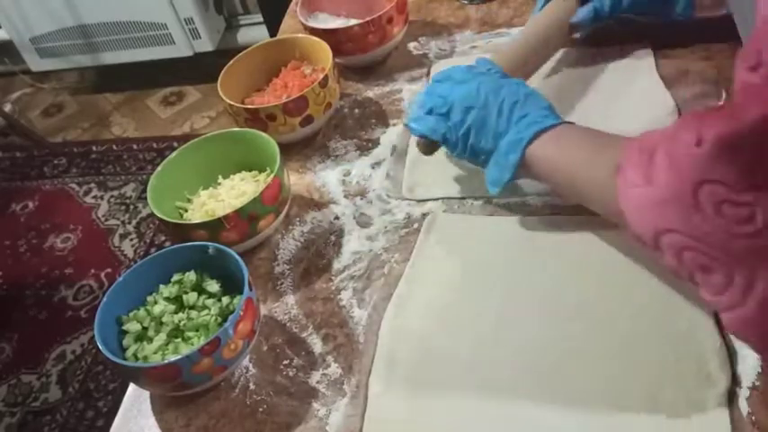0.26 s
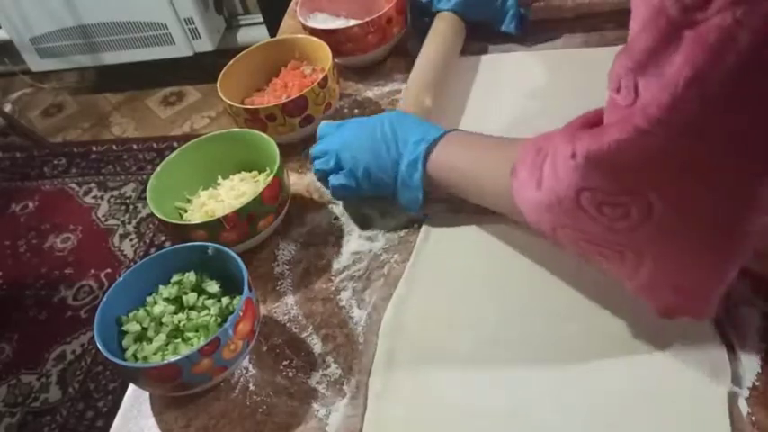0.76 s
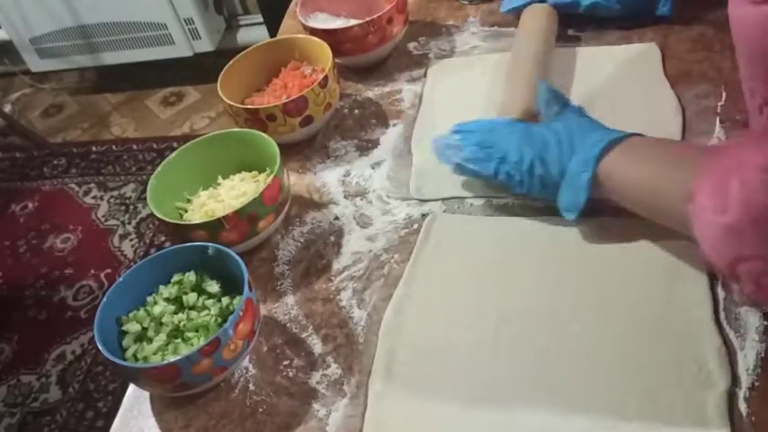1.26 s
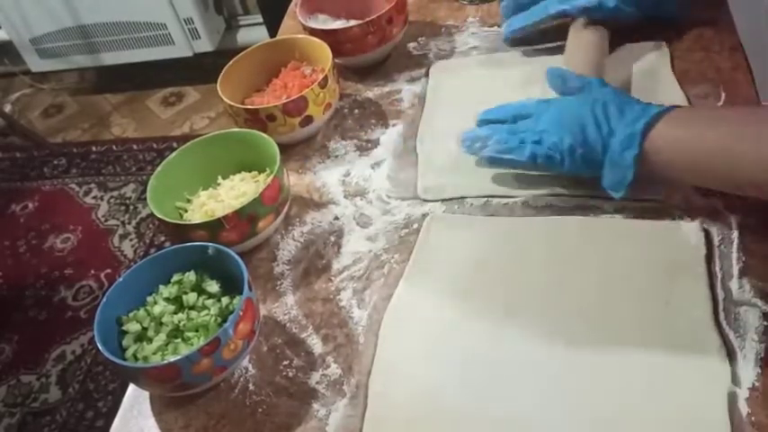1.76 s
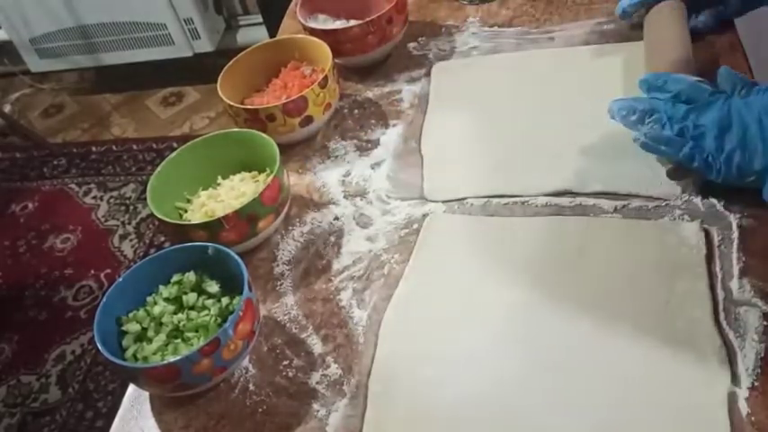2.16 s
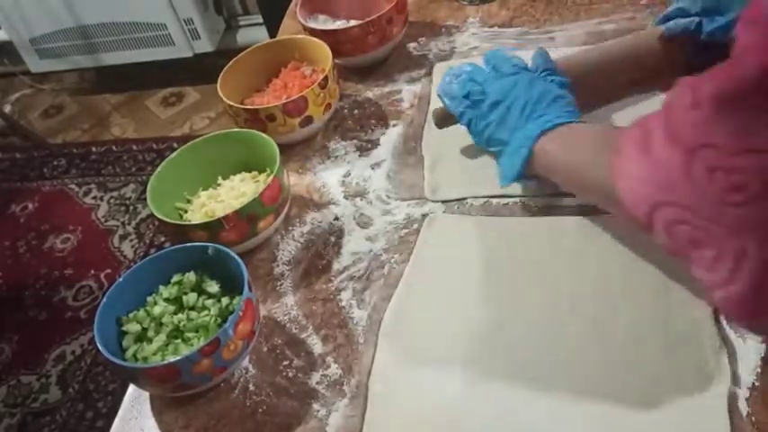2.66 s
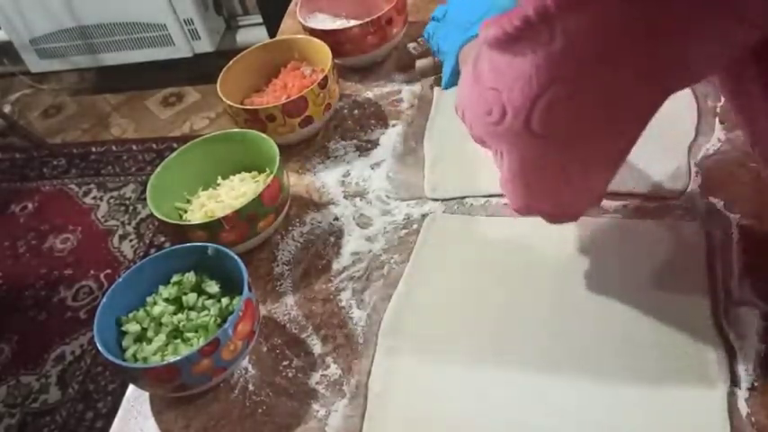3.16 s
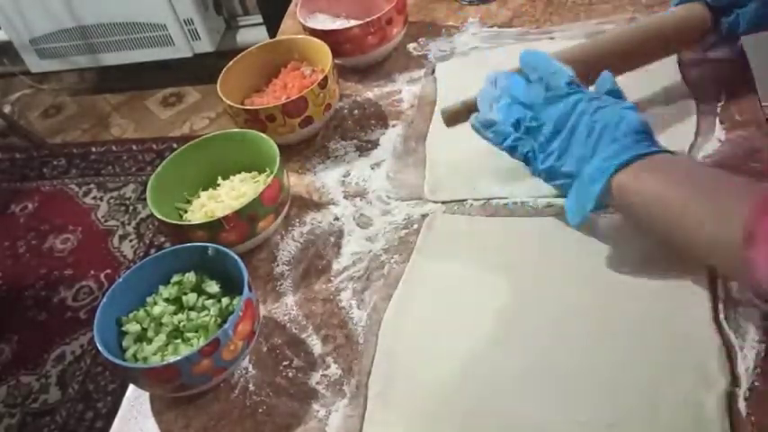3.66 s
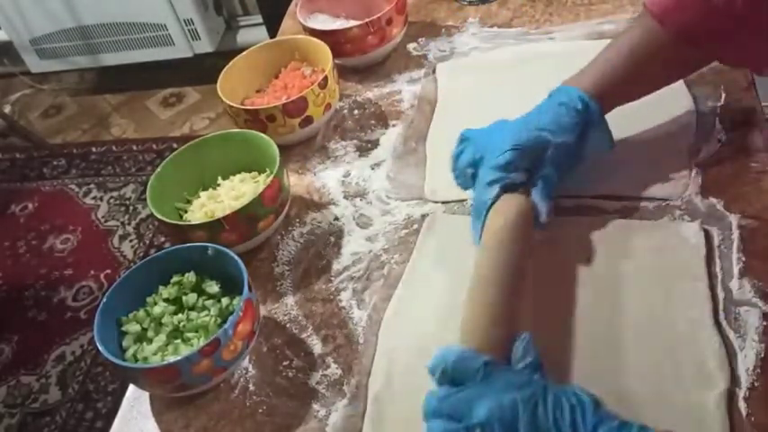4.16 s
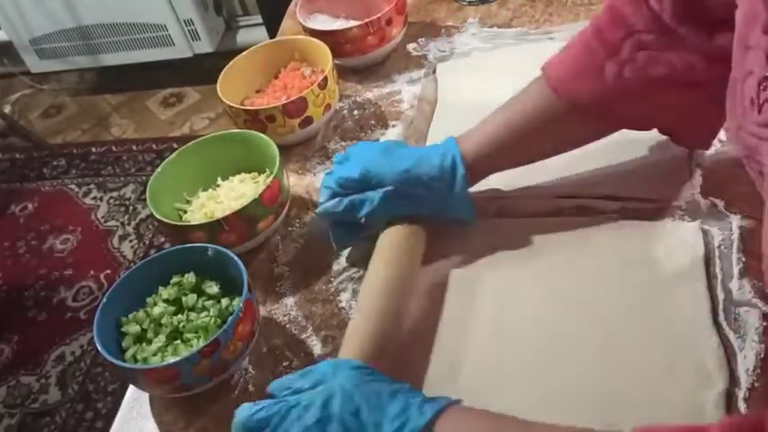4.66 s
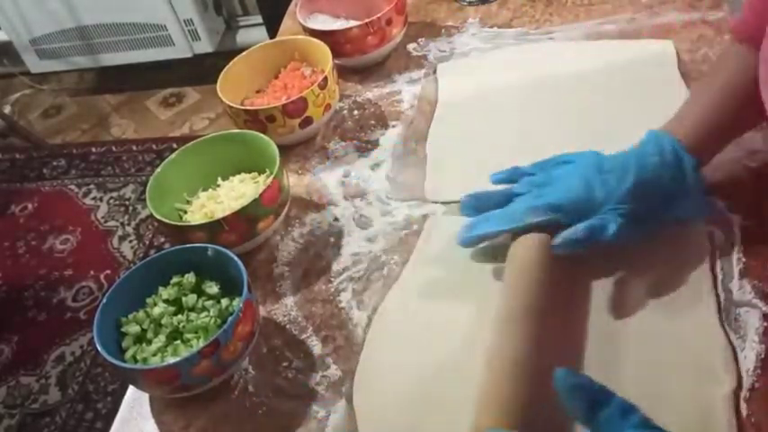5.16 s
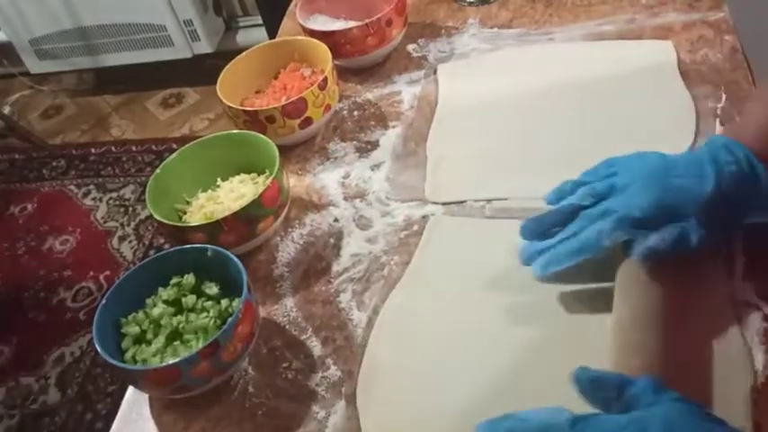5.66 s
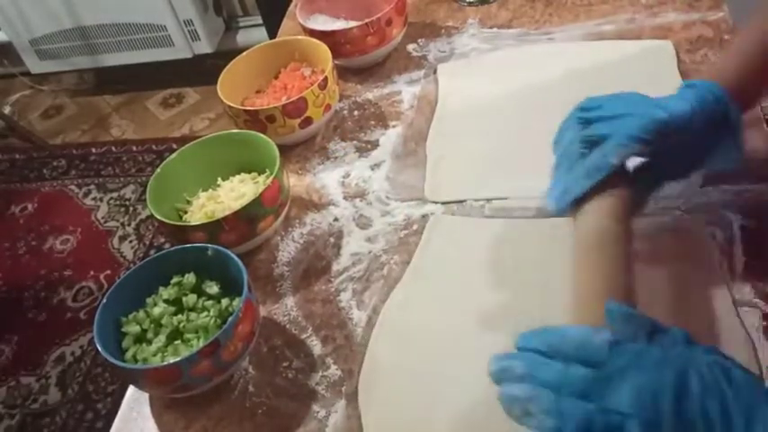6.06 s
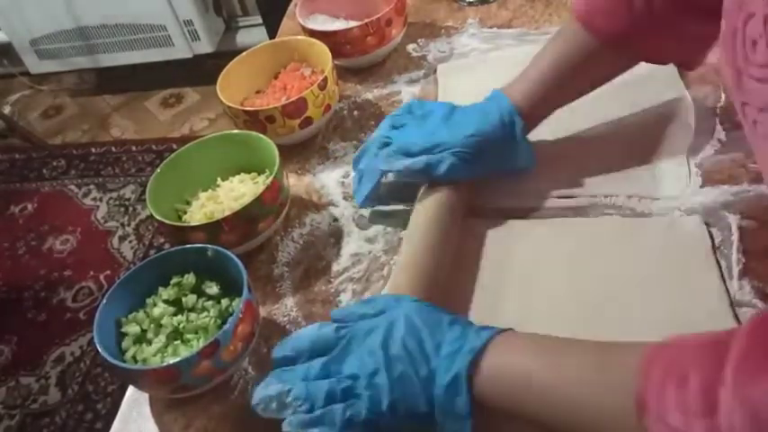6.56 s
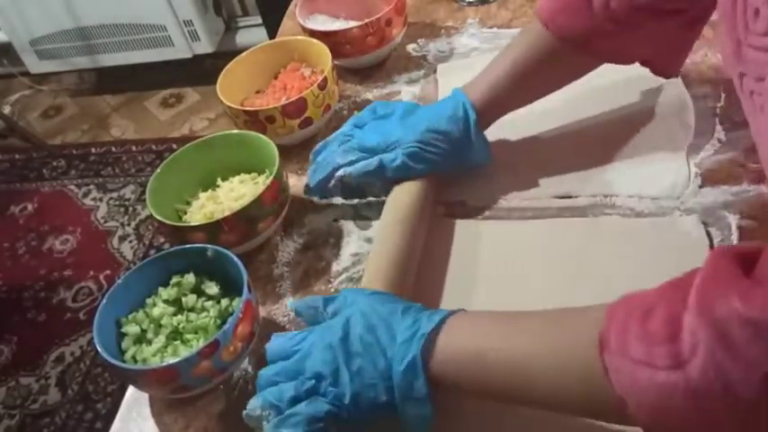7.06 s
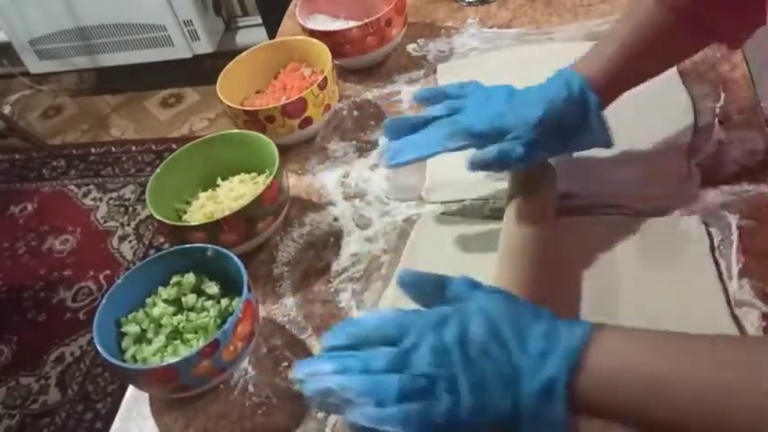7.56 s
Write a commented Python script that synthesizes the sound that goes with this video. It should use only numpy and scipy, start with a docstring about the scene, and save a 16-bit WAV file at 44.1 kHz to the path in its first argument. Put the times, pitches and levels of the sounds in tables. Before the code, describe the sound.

A wooden rolling pin rumbles softly over dough as rubber gloves rub and hiss, with light knocks and one hard knock late on.

```python
"""A wooden pin rolled over dough by gloved hands, on a floured table in a quiet kitchen.
The pin rumbles and drones under load, judders and knocks on the table top, once hard, just after a
low ringing scrape. Rubber gloves stick and slip on the wood with a dry hiss and brief squeaks.
Two microphone ports close together hear it mostly direct, with faint room echoes and still air."""
import sys
import numpy as np
from scipy import signal
from scipy.io import wavfile
from scipy.ndimage import uniform_filter1d

SR = 44100
rng = np.random.default_rng(int(sys.argv[2]) if len(sys.argv) > 2 else 0)


def int16_out(signal):
    """Quantize to a 16-bit WAV file."""
    q = np.round(np.clip(np.atleast_2d(signal).T, -1, 1) * 32767)
    wavfile.write(sys.argv[1], SR, q.astype(np.int16))


N = 344421

# overall treble colour, slightly dull near 5 kHz, hollow from 9 to 11 kHz: f/Hz, gain/dB
TREBLE_COLOUR = [(4600, 2), (4900, -4), (5900, -5.5), (6200, -0.5), (8400, -3), (8700, -12), (10000, -15.5),
                 (11000, -33), (11350, -43), (11650, 2)]
# how alike noise is at the two ports: f/Hz, correlation
PORT_LIKENESS = [(60, 0.29), (150, 0.13), (400, 0.28), (1000, 0.23), (2500, 0.09), (5000, 0.22),
                 (9000, 0.103), (15000, .05)]
# balance of noise between the ports: f/Hz, left minus right/dB
PORT_BALANCE = [(60, 10), (130, -1), (290, 2), (640, 0), (1410, 0), (3100, -1), (6820, 3), (15000, -3.5)]
# still kitchen air and microphone hiss: f/Hz, relative density/dB
AIR_SPECTRUM = [(30, -39), (55, -12.5), (100, 2.5), (250, -1), (800, -11), (2200, -15), (4300, -13),
                (7400, -12), (15000, -21.5)]
# decay of the kitchen's echoes: f/Hz, t60/s
KITCHEN_DECAY = [(80, 0.18), (250, 0.25), (700, 0.19), (1500, 0.11), (4000, 0.064)]
# brief glove squeaks, and one low ringing scrape just before the hard knock:
# middle t/s, width at half height/s, f/Hz, level/dB
SQUEAKS_AND_SCRAPE = [(1.966, 0.067, 1340, -68), (2.823, 0.085, 1730, -64), (3.499, 0.082, 1195, -65),
                      (5.365, 0.085, 1730, -68.5), (6.272, 0.062, 501, -56.5)]
# glove slides: full speed at t/s, rise/s, hold/s, fall/s, hiss level/dB, scuff re hiss/dB
GLOVE_SLIDES = [(0.0, .01, 0.0054, 0.11, -56, -4.5), (0.151, 0.0093, 0.059, 0.062, -46, -14),
                (0.266, 0.13, 0.077, .04, -56, -8.5), (0.439, 0.1, 0.19, 0.091, -51, -6),
                (0.68, 0.037, .005, 0.29, -49, -4.5), (0.96, 0.052, 0.11, 0.24, -56.5, -9),
                (1.137, 0.14, .01, 0.24, -52, -5), (1.3, 0.23, 0.028, 0.16, -54.5, -6),
                (1.42, 0.085, .005, 0.078, -49.5, -13), (1.622, .01, .01, .05, -54.5, -16),
                (1.631, 0.016, 0.0046, 0.1, -52.5, -6.5), (1.785, 0.15, 0.057, .15, -57, -11.5),
                (1.964, 0.18, .005, 0.096, -49, -9), (2.127, 0.31, .005, 0.2, -50.5, -13),
                (2.302, 0.15, .005, 0.27, -49.5, -6), (2.532, 0.021, 0.033, 0.073, -50, -10),
                (2.635, 0.1, 0.032, 0.077, -45, -14), (2.812, 0.097, .005, 0.11, -44, -7.5),
                (2.882, 0.11, 0.25, 0.079, -58, -4.5), (3.33, 0.19, 0.14, 0.19, -54.5, -6.5),
                (3.496, 0.27, 0.15, 0.09, -47.5, -6.5), (3.735, .08, .02, 0.2, -57, -6),
                (3.849, 0.049, 0.021, 0.063, -39, -17), (3.932, .1, 0.11, 0.062, -50.5, -12),
                (4.125, 0.12, 0.12, .1, -59.5, -9.5), (4.281, 0.079, .005, 0.25, -47.5, -4.5),
                (4.5, 0.33, 0.0045, 0.039, -50.5, -14), (4.518, 0.14, 0.22, 0.23, -56, -5.5),
                (5.006, 0.22, .005, 0.21, -50, -8), (5.17, 0.27, 0.078, 0.25, -49.5, -7.5),
                (5.348, .006, .003, .03, -47, -16), (5.388, 0.16, 0.0058, 0.042, -46.5, -12.5),
                (5.568, 0.014, 0.0024, 0.096, -48, -9), (5.745, 0.29, 0.08, 0.08, -56, -7.5),
                (5.88, 0.14, .005, 0.18, -49.5, -9.5), (6.035, 0.03, .005, 0.17, -50.5, -12),
                (6.125, 0.048, 0.066, 0.11, -48, -17.5), (6.344, 0.058, 0.031, 0.1, -51, -6.5),
                (6.484, 0.29, .01, 0.68, -53.5, -7), (6.892, 0.51, .005, 0.097, -57.5, -3.5),
                (7.024, 0.12, 0.0041, 0.11, -59, -5), (7.265, 0.24, 0.11, .2, -54.5, -5),
                (7.443, 0.36, 0.038, 0.045, -49, -13), (7.652, 0.028, 0.057, 0.059, -60.5, -7.5),
                (7.714, 0.009, 0.0066, 0.16, -50, -8)]
# fine hiss of the gloves: f/Hz, relative density/dB
HISS_SPECTRUM = [(2000, -29.5), (4000, -16.5), (6300, -2.5), (7400, 0.5), (9000, -5), (13000, -13),
                 (16000, -10)]
# lower scuff of the gloves: f/Hz, relative density/dB
SCUFF_SPECTRUM = [(300, -5.5), (800, -18.5), (1300, -5), (2200, -8), (3800, -1.5), (5000, -4.5),
                  (7000, -8.5), (10000, -36)]
# the pin rolling under load: t/s, rumble level/dB, drone level/dB
ROLL_LEVELS = [(0.0, -67.5, -75), (0.51, -69, -73), (1.1, -67, -68.5), (1.6, -66.5, -71.5),
               (2.05, -65.5, -66.5), (2.45, -71.5, -76), (3.0, -68, -67), (3.2, -68, -72),
               (3.49, -65, -67.5), (4.12, -72.5, -73.5), (4.7, -66, -73.5), (5.16, -65.5, -72),
               (5.538, -68, -72.5), (5.77, -64, -64), (6.101, -65, -72.5), (6.6, -63, -69),
               (6.92, -68, -67), (7.114, -66, -71), (7.3, -60, -69.5), (7.512, -70, -69),
               (7.81, -62, -78.5)]
# rumble of pin on dough and table: f/Hz, relative density/dB
RUMBLE_SPECTRUM = [(40, -33.5), (62, -2), (100, 1.5), (250, 2.5), (450, -13), (900, -40.5)]
# the pin's own hollow drone: f/Hz, relative density/dB
DRONE_SPECTRUM = [(200, -29), (450, 1.5), (800, -4), (1400, -16.5), (2500, -32.5)]
# low modes of the table top: f/Hz, relative level/dB, t60/s
TABLE_MODES = [(81.4, -1, .18), (103.1, 1, .22), (131, 0, 0.28), (195, 2, 0.22), (215, -1, .2),
               (262, -2, 0.22), (303, -3, .2), (343, -11, 0.16), (444, 0, 0.16), (484, -6, 0.15),
               (553, -6, .14), (658, -2, 0.24), (700, -8, .22)]
# clear modes of the pin: f/Hz, relative level/dB, t60/s
PIN_MODES = [(787, -18, .3), (851, -17, .22), (888, -13, .22), (960, -14, .23), (1097, -17, .2),
             (1172, -19, .2), (1294, -19, .42), (1415, -22, .2)]
# upper modes of pin and table, too dense to tell apart: f/Hz, relative density/dB, t60/s
DENSE_MODES = [(302.6, -31, 0.26), (450, 6, 0.22), (605, -3.5, 0.3), (900, -1.5, 0.16), (1400, -13, 0.32),
               (1900, -22, 0.19), (2800, -24.5, 0.15), (4440, -31, .06), (7000, -38, 0.033)]
# the pin juddering: start t/s, end t/s, beat rate/Hz, level at the crest/dB, thump f/Hz
PIN_JUDDERS = [(1.775, 2.25, 19.9, -52.5, 272), (5.653, 5.92, 20.0, -47.5, 287)]
# the pin knocking on the table: t/s, thump level/dB, thump f/Hz, ring re thump/dB, clack re thump/dB
PIN_KNOCKS = [(0.0501, -49.5, 533, -27, -16), (0.059, -50, 280, -16, -30), (0.141, -51.5, 550, -10, -16),
              (0.151, -53, 258, -17, -22), (0.236, -55, 262, -4, -10), (.578, -57, 150, -9, -25),
              (.603, -54.5, 78.5, -10, -37), (1.182, -51, 1150, -20, -13), (1.2, -49.5, 624, -18, -23),
              (1.213, -62, 266, 8, -20), (1.505, -56, 82, -17, -35), (1.645, -56, 400, -20, -11),
              (2.308, -43.5, 520, -18, -23), (2.315, -49.5, 245, 2, -14), (2.803, -57, 79.4, -9, -30),
              (2.835, -57, 85, -8, -28), (3.553, -52, 307, -30, -17), (4.280, -45.5, 1400, -27, -18),
              (4.2828, -35.5, 130, -2, -41), (4.298, -36.5, 220, -7.5, -43), (5.3, -53, 500, -5, -11),
              (5.587, -57.5, 130, -8, -25), (6.249, -52, 486, -6, -20), (6.332, -5.5, 260, -9.5, -27.5),
              (6.3369, -12, 410, -20, -14.5), (6.3409, -8, 439, -10.5, -30), (7.729, -43.5, 103, -13, -23),
              (7.753, -65, 150, -3, 0)]

LAG_S = 5 / SR  # the right port hears the table later
LOW_CUT_HZ, BAND_LIMIT_HZ = 62, 15450
AIR_DB, ECHO_DB = -64, -16
SQUEAK_WIDTH_HZ = 32
SWING_DB = 20  # a slide gains this over its rise time and loses it over its fall time
DEEP_HZ = 95  # thumps below this pitch wobble for several cycles
JUDDER_RING_DB, JUDDER_CLACK_DB = -9, -17  # re each beat's thump


def gain_of(db):
    """Decibels to a factor."""
    return 10 ** (np.asarray(db) / 20)


def unit_rms(x):
    """Scales to an rms of one."""
    return x / np.sqrt(np.mean(x ** 2) + 1e-20)


def curve_at(points, hz):
    """Interpolates a table over log frequency."""
    f, value = np.transpose(points)
    return np.interp(np.log(hz + 1), np.log(f + 1), value)


def add(mix, start, sound):
    """Mixes a sound in from sample start on."""
    part = mix[max(start, 0):][:len(sound)]
    part += sound[:len(part)]


def ring(modes, samples, phase=0):
    """Struck modes: a sum of dying sines."""
    t = np.arange(samples) / SR
    return sum(gain_of(db - 60 * t / t60) * np.sin(2 * np.pi * f * t - phase) for f, db, t60 in modes)


def port_noise(spectrum, patchy_db, size=512):
    """Noise of rms one at the two ports, its level drifting in patches of time and frequency."""
    frames, hz = 4 * N // size + 5, np.fft.rfftfreq(size, 1 / SR)
    a, b, c, d, patches = rng.standard_normal((frames, len(hz), 5)).T
    patches = unit_rms(uniform_filter1d(uniform_filter1d(patches, size=6, axis=0), size=14, axis=1))
    likeness = curve_at(PORT_LIKENESS, hz)[:, None]
    left = a + 1j * b
    right = likeness * left + np.sqrt(1 - likeness ** 2) * (c + 1j * d)
    right *= np.exp(-2j * np.pi * hz * LAG_S)[:, None]
    lean = gain_of(curve_at(PORT_BALANCE, hz) / 2)[:, None]
    colour = gain_of(curve_at(spectrum, hz)[:, None] + patchy_db * patches)
    bands = np.array([left * lean, right / lean]) * colour
    return unit_rms(signal.istft(bands, nperseg=size, noverlap=3 * size // 4)[1][:, :N])


def room_tone():
    """Still kitchen air and the microphone's own hiss."""
    return gain_of(AIR_DB) * port_noise(AIR_SPECTRUM, patchy_db=2.5, size=2048)


def kitchen_echoes(source):
    """Room reflections: sparse taps of random sign, each band dying at its own speed."""
    taps = np.zeros((2, SR // 2))
    arrivals = np.arange(160, SR // 2 - 20, 20) + rng.integers(0, 20, (2, (SR // 2 - 161) // 20))
    np.put_along_axis(taps, arrivals, rng.choice([-1., 1.], arrivals.shape), 1)
    taps = taps + 0.3 * taps[::-1]  # close ports share some echoes
    hz, t, bands = signal.stft(taps, SR, nperseg=512)
    decay = gain_of(-60 * t / curve_at(KITCHEN_DECAY, hz)[:, None])
    tail = signal.istft(bands * decay, SR, nperseg=512)[1]
    tail /= np.linalg.norm(tail[0])
    return gain_of(ECHO_DB) * signal.fftconvolve(source[None], tail, axes=1)[:, :N]


def squeaks_and_scrape():
    """Glove squeaks and one scrape ringing the table: each a narrow noise band that swells and fades."""
    out = np.zeros((2, N))
    for s, width, hz, db in SQUEAKS_AND_SCRAPE:
        t = np.arange(-width, width, 1 / SR)
        white = rng.standard_normal((2, SR // 2)) + 1j * rng.standard_normal((2, SR // 2))
        drift = signal.lfilter([1], [1, -np.exp(-np.pi * SQUEAK_WIDTH_HZ / SR)], white)[:, -len(t):]
        tone = unit_rms((drift * np.exp(2j * np.pi * hz * t)).real)
        swell = np.cos(np.pi * t / (2 * width)) ** 2
        add(out.T, round((s - width) * SR), (gain_of(db) * tone * swell).T)
    return out


def glove_slides():
    """Stick and slip of rubber on floured wood: fine hiss and lower scuff, both gritty."""
    t = np.arange(0, N + 64, 64) / SR
    s, rise, hold, fall, hiss_db, scuff_db = np.transpose(GLOVE_SLIDES)[:, :, None]
    fade = np.maximum(s - t, 0) / rise + np.maximum(t - s - hold, 0) / fall
    power = gain_of(hiss_db - SWING_DB * fade) ** 2  # overlapping slides add in power
    hiss_level, scuff_level = (np.interp(np.arange(N) / SR, t, np.sqrt(p.sum(0)))
                               for p in (power, power * gain_of(scuff_db) ** 2))
    slips = gain_of(17 * np.minimum(rng.exponential(1, N), 4))
    slips *= rng.random(N) < 400 / SR  # about 400 slips a second
    flares = signal.lfilter([1], [1, -np.exp(-1 / (0.0016 * SR))], slips)  # each fades in 1.6 ms
    grit = unit_rms(1 + 0.08 * unit_rms(flares))
    hiss = hiss_level * port_noise(HISS_SPECTRUM, patchy_db=1.5)
    scuff = scuff_level * port_noise(SCUFF_SPECTRUM, patchy_db=2.4)
    wander = uniform_filter1d(uniform_filter1d(rng.standard_normal(N), size=1300), size=900)
    swishes = unit_rms(gain_of(2 * unit_rms(wander)))
    return grit * (hiss + scuff * swishes)


def table_thump(hz, ring_db, damping):
    """A soft thump of peak one, centred 2048 samples in, rings the low modes of the table top."""
    t = np.arange(-2048, 2048) / SR
    steepness = damping * np.where(t < 0, 1.4, 1)  # rises faster than it fades
    thump = np.cos(2 * np.pi * hz * t) * np.exp(-(steepness * hz * t) ** 2)
    sound = signal.fftconvolve(thump, ring(TABLE_MODES, SR // 2))
    sound *= gain_of(ring_db) / abs(sound).max()
    add(sound, 0, thump)
    return sound


def wood_clack():
    """Wood on wood: dense modes as noise that dies band by band, and the clear ring of the pin."""
    f, db, t60 = np.transpose(DENSE_MODES)
    left, unshared = rng.standard_normal((2, SR // 2))
    right = np.cos(1.2) * left + np.sin(1.2) * unshared
    hz, t, bands = signal.stft(np.array([left, right]), SR, nperseg=256)
    level_db = curve_at(np.c_[f, db], hz)[:, None] - 60 * t / curve_at(np.c_[f, t60], hz)[:, None]
    dense = signal.istft(bands * gain_of(level_db), SR, nperseg=256)[1]
    samples = dense.shape[1]
    dense *= 1 - np.exp(-np.arange(samples) / (0.00058 * SR))  # brief build-up
    dense /= np.sqrt(2 * np.mean(dense[:, :512] ** 2))
    return dense + ring(PIN_MODES, samples, phase=np.array([[0], [1.2]]))  # the left port leads


def pin_judders():
    """Runs of light blows at a steady beat that swell and fade, uneven in strength and pitch."""
    for start, end, rate, db, hz in PIN_JUDDERS:
        for s in np.arange(start, end, 1 / rate):
            arch = np.sin(np.pi * (s - start + .03) / (end - start + 0.034))
            beat_db = db + 12 * np.log10(arch) + 1.9 * rng.standard_normal()
            beat_hz = hz * (1 + 0.049 * rng.standard_normal())
            yield s, beat_db, beat_hz, JUDDER_RING_DB, JUDDER_CLACK_DB


def pin_knocks():
    """The pin strikes the table, singly and in judders: (mono thumps, clacks at both ports)."""
    blows = [(blow, 1.25 if blow[2] > DEEP_HZ else .45) for blow in PIN_KNOCKS]
    blows += [(blow, .8) for blow in pin_judders()]
    thumps, clacks = np.zeros(N), np.zeros((2, N))
    for (s, db, hz, ring_db, clack_db), damping in blows:
        add(thumps, round(s * SR) - 2048, gain_of(db) * table_thump(hz, ring_db, damping))
        contact = round((s - .5 / hz) * SR)  # wood meets wood half a cycle before the thump peaks
        add(clacks.T, contact, gain_of(db + clack_db) * wood_clack().T)
    return thumps, clacks


def pin_rolling():
    """Lumpy low noise of the pin pressing dough into the table, and its own hollow drone."""
    s, rumble_db, drone_db = np.transpose(ROLL_LEVELS)
    t = np.arange(N) / SR
    rumble = gain_of(np.interp(t, s, rumble_db)) * port_noise(RUMBLE_SPECTRUM, patchy_db=2.5, size=2048)
    drone = gain_of(np.interp(t, s, drone_db)) * port_noise(DRONE_SPECTRUM, patchy_db=2.2)
    return rumble + drone


def scene():
    """At the microphone: knocks land a little earlier and louder on the left, over rub, rumble and air."""
    thumps, clacks = pin_knocks()
    direct = np.array([thumps, gain_of(-1.2) * np.roll(thumps, round(LAG_S * SR))])
    direct += clacks * gain_of([[1.2], [-1.2]])
    room = room_tone() + kitchen_echoes(thumps)
    return room + glove_slides() + squeaks_and_scrape() + pin_rolling() + direct


def record(dry):
    """Bass roll-off, overall treble colour, then the band limit."""
    hz = np.linspace(0, SR / 2, 1025)
    low_cut = signal.butter(N=2, Wn=LOW_CUT_HZ, btype="high", fs=SR, output="sos")
    colour = signal.firwin2(1023, hz, gain_of(curve_at(TREBLE_COLOUR, hz)), fs=SR)
    band_limit = signal.firwin(511, BAND_LIMIT_HZ, window=("kaiser", 9), fs=SR)
    return signal.oaconvolve(signal.sosfilt(low_cut, dry), np.convolve(colour, band_limit)[None], "same")


dry = scene()
out = record(dry)
int16_out(out)
```